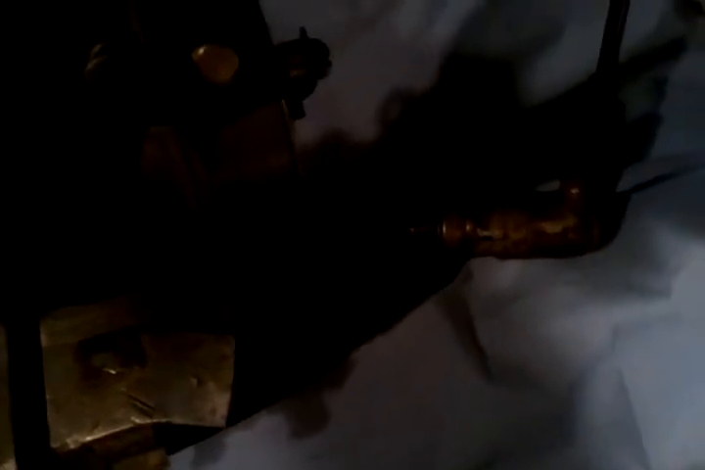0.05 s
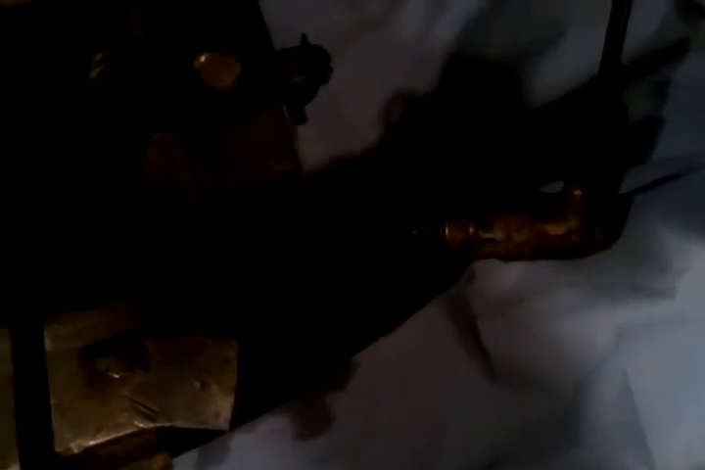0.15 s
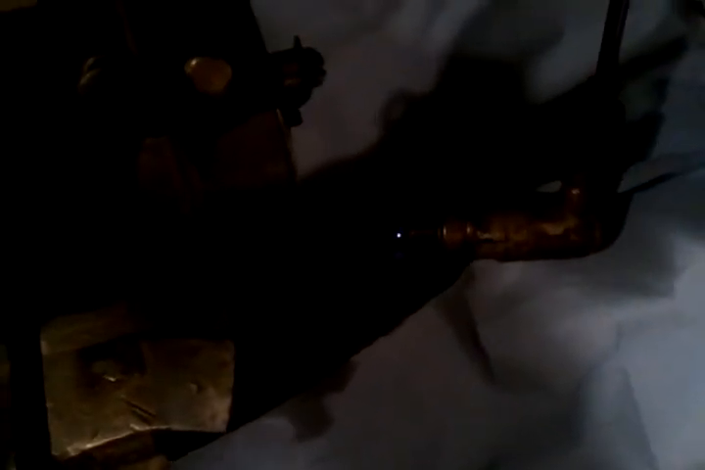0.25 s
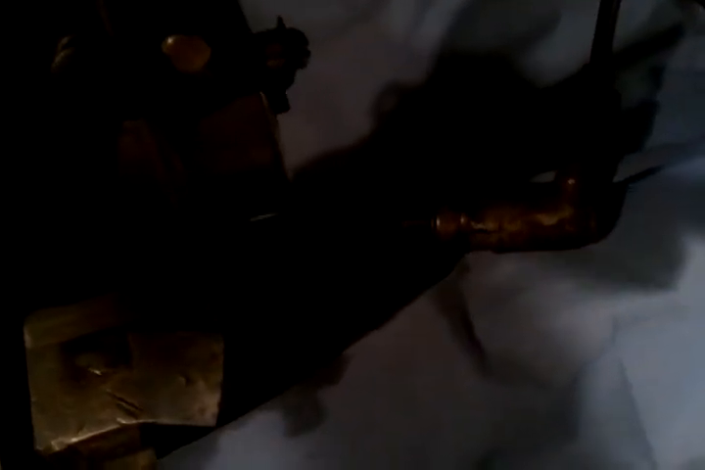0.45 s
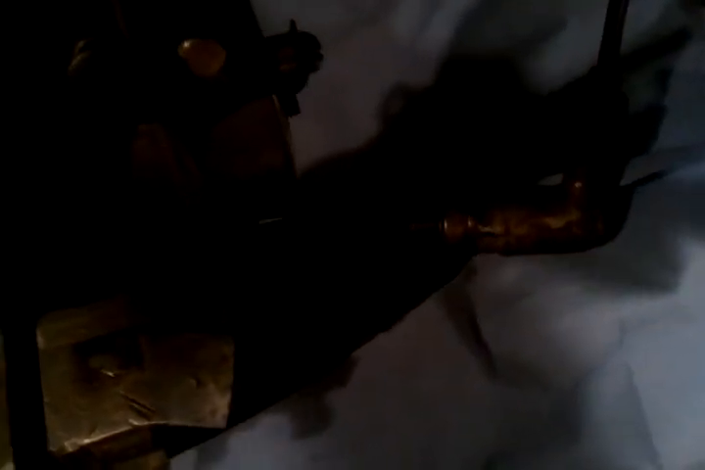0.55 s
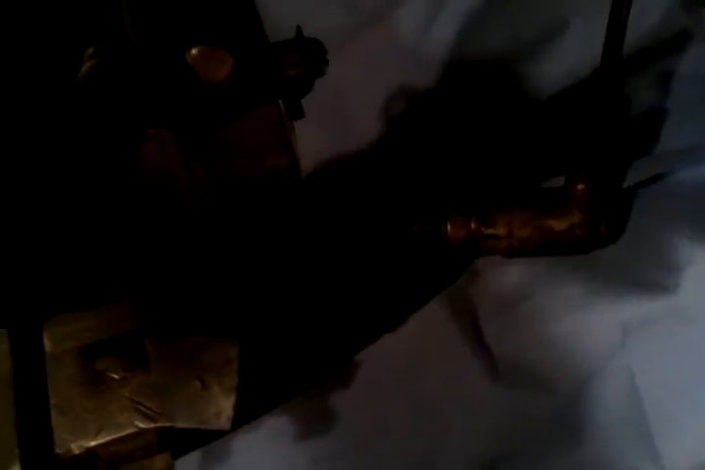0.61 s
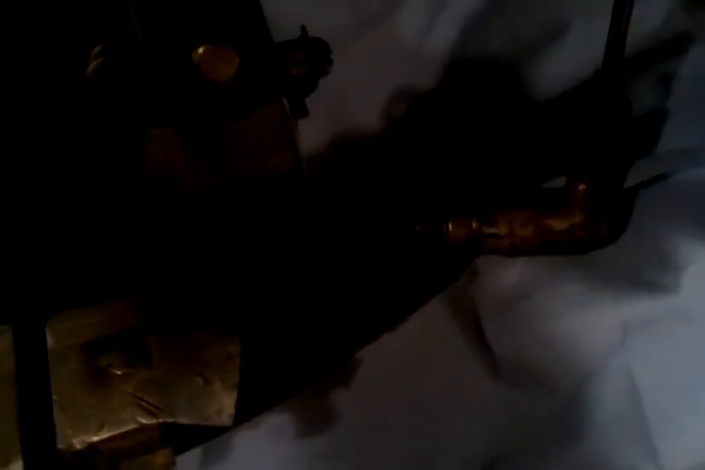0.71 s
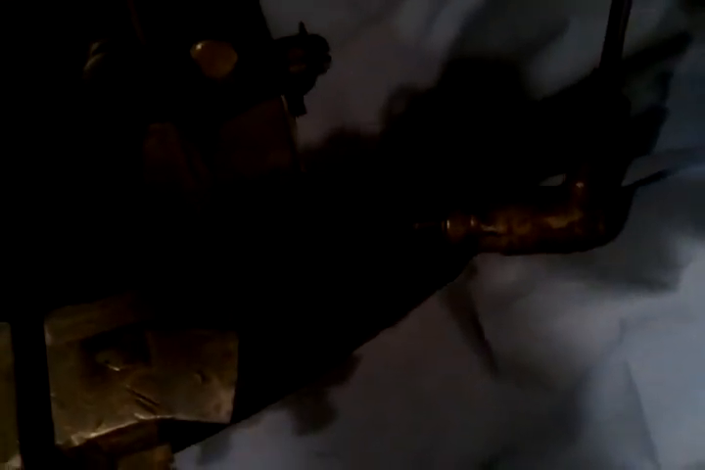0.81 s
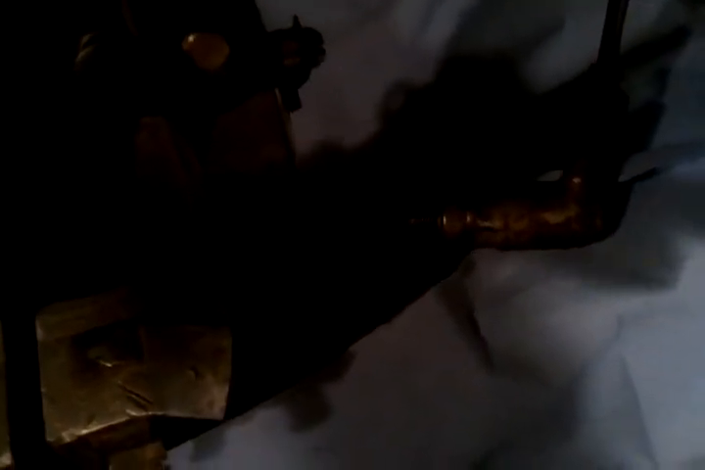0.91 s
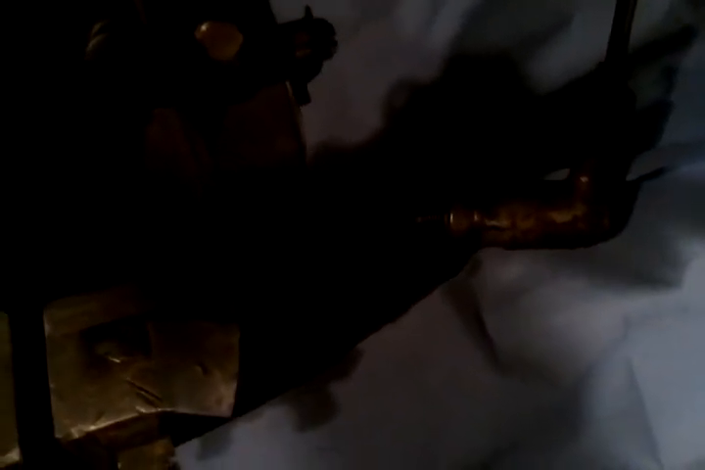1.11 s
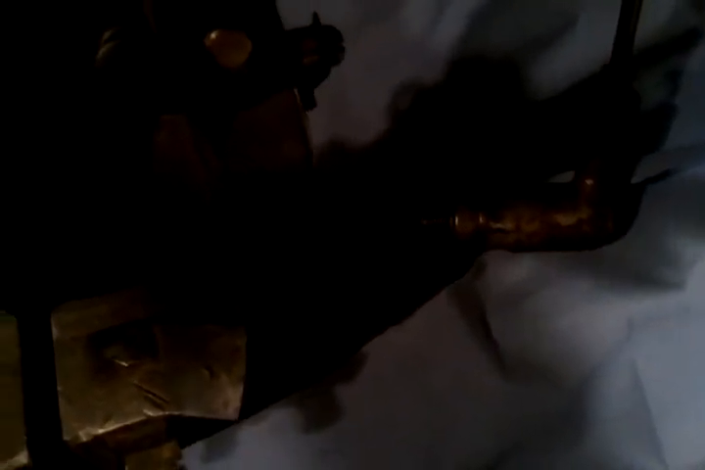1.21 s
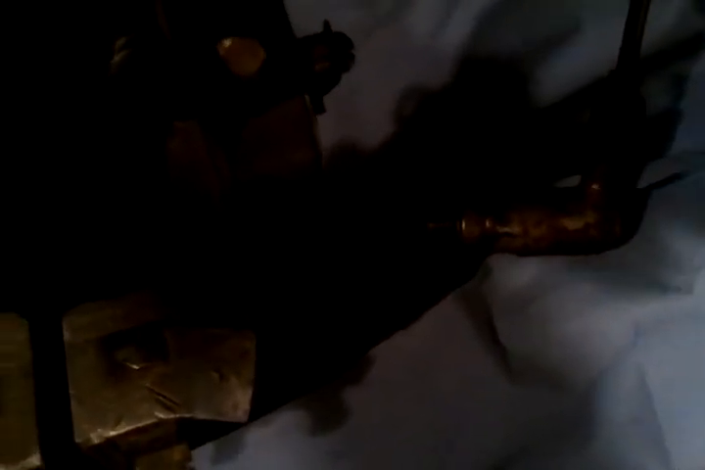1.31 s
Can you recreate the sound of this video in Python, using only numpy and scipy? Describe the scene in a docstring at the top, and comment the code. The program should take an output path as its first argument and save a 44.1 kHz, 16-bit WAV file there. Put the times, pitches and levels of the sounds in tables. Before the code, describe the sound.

A hand-turned magneto clatters and snaps close to the microphone. At first, a steel ring fades over faint workshop hiss. From about 0.2 to 0.4 seconds the spring coupling scrapes and clatters loudly, ringing on. Soft ticks follow near 0.45 and 0.65 seconds. At about 1 second it snaps home with a hard, slightly overloaded clack, a low bench thump and a short metallic ring.

```python
"""First comes the fading ring of steel from a snap just past, over a faint workshop hiss.
A magneto (a small spark generator) is being turned by hand on a bench, close to a small microphone.
Its spring coupling scrapes and clatters round, ticks twice, then snaps home. Each blow makes the
housing clank and the steel ring on; heavy jolts make the bench boom.
The loudest blows overload the microphone."""
import sys
import numpy as np
from scipy import signal
from scipy.fft import rfft, irfft
from scipy.io import wavfile

SR = 44100
rng = np.random.default_rng(int(sys.argv[2]) if len(sys.argv) > 2 else 0)


def generate_wav(sig):
    """Save sig (samples, or channels by samples) to the path in sys.argv[1] as 16-bit PCM at SR."""
    pcm = np.round(np.clip(np.atleast_2d(sig).T, -1, 1) * 32767).astype(np.int16)
    wavfile.write(sys.argv[1], SR, pcm)


N = 59535


def amp(db):
    """Turns decibels into a number to multiply by."""
    return 10 ** (np.asarray(db) / 20)


def unit(x):
    """Scales a sound to an average power of 1."""
    return x / np.sqrt(np.mean(x ** 2) + 1e-20)


def read(points, hz):
    """Reads between the rows of a table, spacing frequencies by octaves."""
    f, value = np.transpose(points)
    return np.interp(np.log(hz + 1), np.log(f + 1), value)


def add(mix, s, sound):
    """Mixes in a sound starting at s seconds, perhaps before zero."""
    at = round(s * SR)
    sound = sound[max(-at, 0):]
    part = mix[max(at, 0):][:len(sound)]
    part += sound[:len(part)]


def colour(x, curve, size=4096):
    """Turns each frequency up or down by curve(hz) dB, with no ringing ahead of the sound."""
    log_gain = np.log(amp(curve(abs(np.fft.fftfreq(size, 1 / SR)))))
    taps = np.fft.ifft(np.exp(np.conj(signal.hilbert(log_gain)))).real
    return signal.fftconvolve(x, taps[:size // 2])[:len(x)]


def tilt(hz, bass_db, treble_db, bass_hz=850, treble_hz=3000):
    """Bass and treble knobs: the change in dB at each frequency."""
    return bass_db / (1 + (hz / bass_hz) ** 4) + treble_db * (1 - 1 / (1 + (hz / treble_hz) ** 4))


# Tone of the hiss: f/Hz, relative level/dB
HISS = [(25, -7.5), (60, 1), (90, 2), (140, -6), (220, -1.5), (630, -4), (1000, -6.5), (1600, -7),
        (3000, -11.5), (6000, -14.5), (7200, -22), (9000, -36.5), (12000, -47)]
def hiss(level_db=-57.5):
    """Faint, steady noise fills the workshop."""
    hz = np.fft.rfftfreq(N, 1 / SR)
    spectrum = rfft(rng.standard_normal(N)) * amp(read(HISS, hz))
    return amp(level_db) * unit(irfft(spectrum, N))


# How long the room echoes: f/Hz, t60/s (the time to fade by 60 dB)
ROOM = [(100, 0.77), (400, 0.38), (1200, .33), (2500, 0.098), (7000, .25)]
def room_tail(t, rise_s=.015):
    """Echoes off the walls blur together, each frequency fading at its own speed."""
    hz, at, spectrum = signal.stft(rng.standard_normal(len(t)), SR, nperseg=256)
    fade = amp(-60 * at / read(ROOM, hz)[:, None])
    tail = signal.istft(spectrum * fade, SR, nperseg=256)[1][:len(t)]
    return tail * (1 - np.exp(-t / rise_s))


# Booms of the bench: t/s, level/dB
BOOMS = [(-.09, -15.5), (0.311, -33.5), (.375, -26.5), (0.987, -22)]
def bench(hz=88, t60=.21, rise_s=.025):
    """After a heavy jolt, the bench's low note swells and fades."""
    out, t = np.zeros(N), np.arange(SR // 2) / SR
    boom = amp(-60 * t / t60) * (1 - np.exp(-t / rise_s)) * np.sin(2 * np.pi * hz * t)
    for s, db in BOOMS:
        add(out, s, amp(db) * boom)
    return out


# Long notes of the steel: f/Hz, t60/s, level in a clack/dB, level in a snap/dB
STEEL = [(930.5, 0.33, -38.5, -23), (1080, 0.52, -34.5, -43.5), (1250, .4, -39.5, -54),
         (1745, 0.47, -40, -40), (1740, 0.38, -26.5, -47.5), (1967.8, 0.56, -23, -28.5),
         (2991.4, 0.37, -27, -56), (3881, .22, -34, -64), (4027, .24, -32.5, -44)]
def steel(rise_s=.006):
    """Every blow in CLACKS and SNAPS (below) feeds energy to the steel, which rings on cleanly."""
    out, now = np.zeros(N), np.arange(N) / SR
    for hz, t60, clack_db, snap_db in STEEL:
        energy = np.zeros(N)
        fade = amp(-60 * now / t60) * (1 - np.exp(-now / rise_s))
        for rows, note_db in ((CLACKS, clack_db), (SNAPS, snap_db)):
            for s, db, _, _, steel_db, _ in rows:
                add(energy, s, (amp(db + steel_db + note_db) * fade) ** 2)
        out += np.sqrt(energy) * np.sin(2 * np.pi * hz * now)
    return out


# Short notes of the housing: f/Hz, t60/s, level in a clack/dB, level in a snap/dB
HOUSING = [(215, 0.15, -34, -24), (346.4, 0.11, -24.5, -14.5), (500, 0.15, -28, -18.5),
           (639.4, .06, -23, -6.5), (729, .06, -21, -10.5), (853, 0.063, -25.5, -3.5),
           (1017, 0.067, -21, -12.5), (1143, .055, -19.5, -8), (1328, 0.12, -11, -17.5),
           (1344, 0.065, -11, -2), (1386, 0.042, -15, -9.5), (1578, 0.023, -19, -11),
           (1662.3, 0.072, -6.5, -15.5), (1842, 0.076, -12.5, -2), (1958, 0.033, -1, -5.5),
           (2094, 0.045, -12.5, -13), (2645, 0.055, -11, -33), (3871, 0.056, -13, -21),
           (4810, .06, -19.5, -25), (7360, .1, -29, -19)]
def housing(t, snap=False, bass_db=0, treble_db=0):
    """The struck housing rings briefly at its clearest notes; a snap favours the low ones."""
    ring = np.zeros(len(t))
    for hz, t60, clack_db, snap_db in HOUSING:
        db = (snap_db if snap else clack_db) + tilt(hz, bass_db, treble_db)
        phase = rng.uniform(0, 2 * np.pi)
        ring += amp(db - 60 * t / t60) * np.cos(2 * np.pi * hz * t + phase)
    return amp(-8) * ring


# Tone the housing gives to a blow: f/Hz, relative level/dB
CLANK = [(30, -48.5), (90, -27), (170, -9.5), (260, -10), (450, -7), (900, -2), (1400, -2), (1950, 2.5),
         (2350, -5), (3100, -13.5), (3900, -12), (4500, -15), (5200, -16.5), (7200, -17.5), (9000, -15.5)]
def clank(t, snap=False, bass_db=0, treble_db=0, housing_db=0, crack_t60=.014, body_t60=.074):
    """Metal hits metal: a sharp crack, a short noisy ring from the housing, and the room's echo."""
    crack = amp(-14.5 - 60 * t / crack_t60)
    body = amp(housing_db - 6.5 - 60 * t / body_t60)
    strike = rng.choice([-1., 1.], len(t)) * (crack + body)
    echo = amp(housing_db + (-24 if snap else -25)) * room_tail(t)
    average_gain = np.sqrt(np.mean(amp(read(CLANK, np.arange(SR // 2))) ** 2))
    return colour(strike + echo, lambda hz: read(CLANK, hz) + tilt(hz, bass_db, treble_db)) / average_gain


# Rubbing as the shaft turns: t/s, level/dB, bass/dB, treble/dB
SCRAPE = [(0.201, -62.5, 2, -3), (.214, -52, 17, -17), (0.221, -26.5, 0, -21), (0.244, -20, -8.5, -10),
          (.275, -5, -12, -6), (0.289, -18, 7, -3), (.325, -8.5, 1.5, 5), (0.358, -14.5, 5, 10.5),
          (0.388, -28.5, 11.5, 8.5), (0.461, -47, 19, -8), (.52, -55.5, 17.5, -31.5), (.6, -60, 13.5, -8),
          (0.899, -80, 16, -16), (0.97, -47, 12, 8)]
def scrape(slips_per_s=1500, spread_db=3.5):
    """Tiny slips of metal on metal shake the housing: brighter under load, duller as parts settle."""
    at, level_db, bass_db, treble_db = np.transpose(SCRAPE)
    now, t = np.arange(N) / SR, np.arange(SR // 2) / SR
    hz = np.fft.rfftfreq(N, 1 / SR)
    slips = (rng.random(N) < slips_per_s / SR) * rng.choice([-1., 1.], N)
    strength = amp(spread_db * np.minimum(rng.exponential(1, N), 3))
    slips = unit(slips * strength)
    bass = irfft(rfft(slips) * tilt(hz, 1, 0) ** 2, N)
    treble = irfft(rfft(slips) * tilt(hz, 0, 1), N)
    slips += bass * (amp(np.interp(now, at, bass_db)) - 1)
    slips += treble * (amp(np.interp(now, at, treble_db)) - 1)
    slips *= amp(np.interp(now, at, level_db)) * (now > at[0]) * (now < at[-1])
    ring = clank(t) + housing(t)  # every slip sets off a small copy of this
    return signal.fftconvolve(slips, ring / np.linalg.norm(ring))[:N]


# Clacks and ticks of the coupling: t/s, level/dB, bass/dB, treble/dB, steel ring/dB, housing ring/dB
# The last four columns are added to the blow's level.
CLACKS = [(.2163, -1, -33, -10.5, -26, -9), (.2368, -8.5, -7, -13.5, -17, -12),
          (.2418, -14, -15, -13, -15.5, 4.5), (.26, -10.5, -14, -16, -14, -7), (.272, 4, -8, 0, -16, -5.5),
          (.2797, 2, -4.5, -2, -13.5, -11), (.302, 3, -17.5, 1.5, -7.5, -3),
          (.3075, 4, -13.5, -2, -12.5, -4.5), (.313, -4.5, -3, 13, -8, 1), (.323, 1, -1.5, 6, -4, 2.5),
          (.338, -7.5, 3.5, 11, 4.5, 3), (.355, -11, -1, 6.5, -7, -3.5), (.3712, -1.5, -7, -22, -6, -1),
          (.4525, -22, 2.5, -16, -26, 1), (.6328, -29, -7, 10.5, -33, -1),
          (.6665, -40.5, -22, -7.5, 1.5, 8)]
# The spring snapping home and bouncing, in the same columns; the first snap falls before time zero.
SNAPS = [(-.16, -2.5, 1.5, -11, 1, 5.5), (.9744, 8.5, -1, -1.5, -9, -8), (.9795, 6, 2.5, -4.5, -10.5, -7.5),
         (1.003, -22, -2.5, 0.5, -17.5, 2.5), (1.018, -23.5, -3, -5, -24, 7)]
def coupling(rows, snap):
    """Each blow of the spring coupling makes a clank and sets the housing's notes ringing."""
    out, t = np.zeros(N), np.arange(SR // 2) / SR
    for s, db, bass_db, treble_db, _, housing_db in rows:
        knock = clank(t, snap, bass_db, treble_db, housing_db)
        ring = amp(housing_db) * housing(t, snap, bass_db, treble_db)
        add(out, s, amp(db) * (knock + ring))
    return out


def scene():
    """The turning magneto in the quiet workshop, in one channel."""
    blows = coupling(CLACKS, snap=False) + coupling(SNAPS, snap=True)
    return (blows + steel() + scrape() + bench() + hiss())[None]


def record(dry, soft_limit=.75, hard_limit=.72, low_hz=120, high_hz=7323, leak_hz=8600, top_hz=16300):
    """A small microphone loses deep bass and high treble, and squashes, then clips, the loudest blows."""
    squashed = dry / (1 + abs(dry / soft_limit) ** 3) ** (1 / 3)
    thinned = signal.sosfilt(signal.butter(2, low_hz, "highpass", fs=SR, output="sos"), squashed)
    treble_cut = signal.firwin(151, high_hz, window=("kaiser", 6), fs=SR)
    treble_leak = amp(-25.5) * signal.firwin(151, leak_hz, window=("kaiser", 6), fs=SR)
    dulled = signal.oaconvolve(thinned, (treble_cut + treble_leak)[None], "same")
    clipped = np.clip(dulled, -hard_limit, hard_limit)
    top_cut = signal.firwin(511, top_hz, window=("kaiser", 9), fs=SR)  # trims the fizz of clipping
    return signal.oaconvolve(clipped, top_cut[None], "same")


dry = scene()
out = record(dry)
generate_wav(out)
```